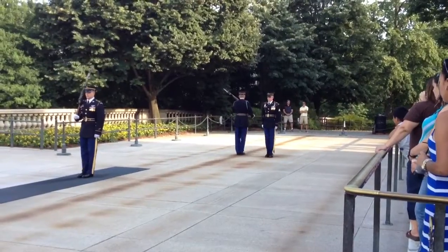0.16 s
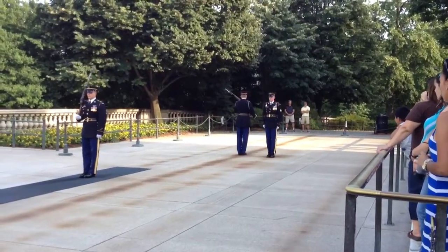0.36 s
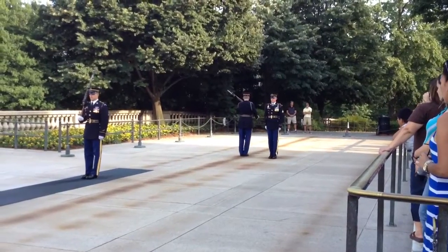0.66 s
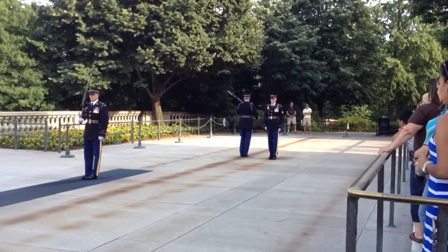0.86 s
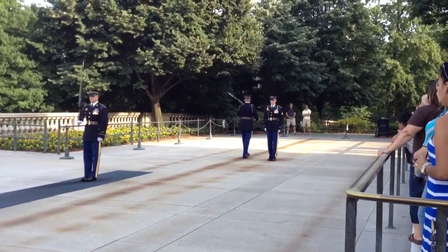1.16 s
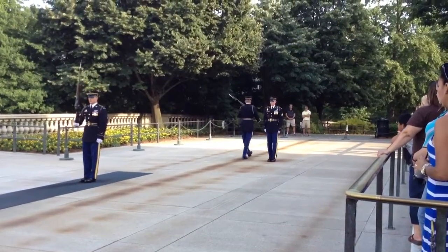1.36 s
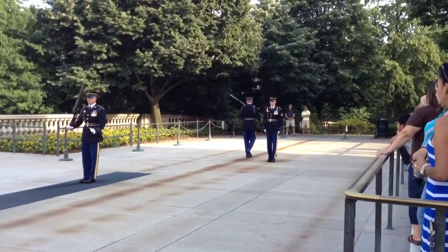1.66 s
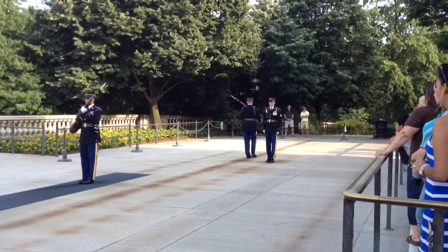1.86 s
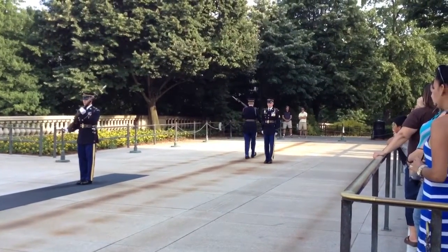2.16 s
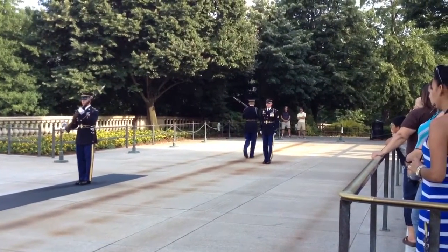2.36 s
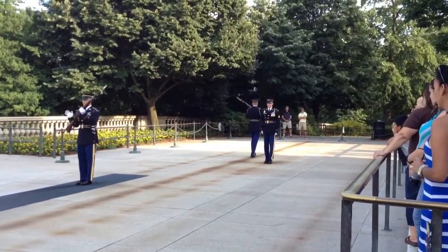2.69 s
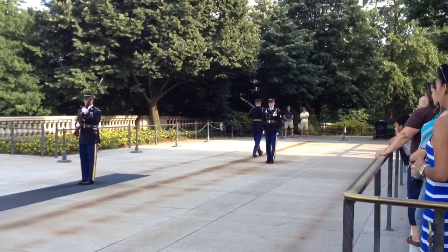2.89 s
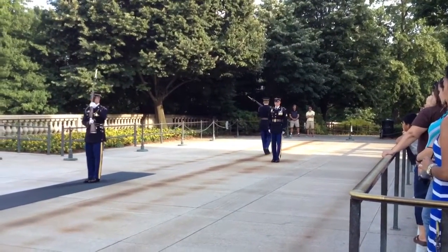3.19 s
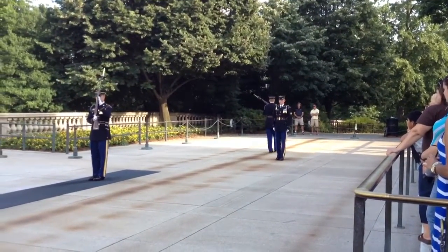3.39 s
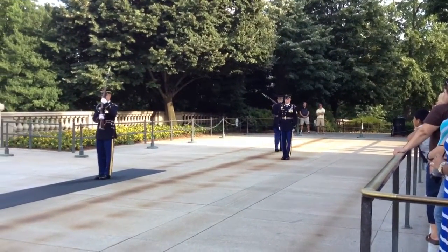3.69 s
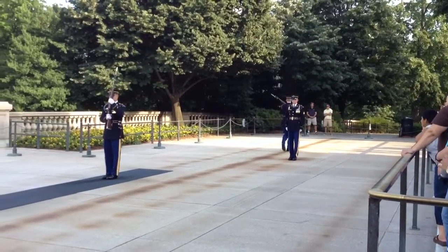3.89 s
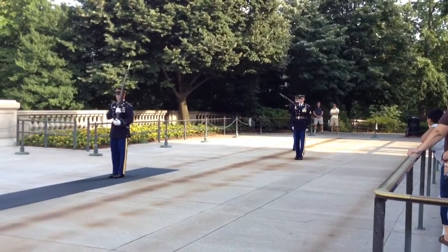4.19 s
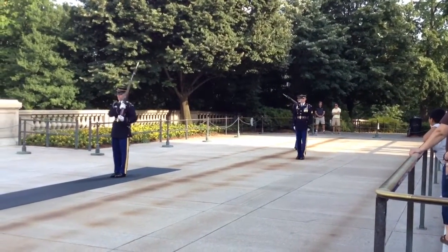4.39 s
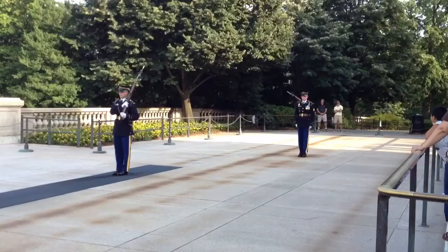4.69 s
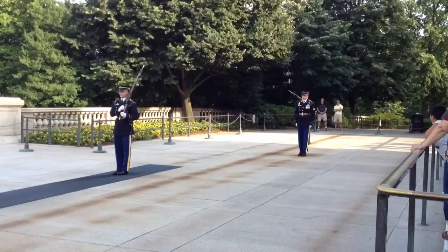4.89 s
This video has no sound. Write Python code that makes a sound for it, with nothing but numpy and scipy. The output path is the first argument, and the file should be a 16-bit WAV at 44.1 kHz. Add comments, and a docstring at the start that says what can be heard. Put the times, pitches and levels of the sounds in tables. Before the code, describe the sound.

Steel-tapped heels crack together on a stone plaza, then three sharp rifle slaps with rattling fittings echo over a low outdoor hum.

```python
"""Steel-shod heels crack together on a stone plaza; then hands slap a rifle and its fittings rattle.
Contacts are short noise bursts filtered by damped bodies; metal parts add decaying sine modes.
Small taps fall in between, and stone walls and trees return every blow as a decaying noise tail.
Behind lie a low hum of distant traffic and swells of insect hiss, both shaped noise,
and one faint bird, a run of gliding sine whistles."""
import sys
import numpy as np
from scipy import signal
from scipy.fft import rfft, irfft
from scipy.io import wavfile
from scipy.ndimage import uniform_filter1d

SR = 44100
rng = np.random.default_rng(int(sys.argv[2]) if len(sys.argv) > 2 else 0)


def int16_out(signal):
    """Quantize to a 16-bit WAV file."""
    q = np.round(np.clip(np.atleast_2d(signal).T, -1, 1) * 32767)
    wavfile.write(sys.argv[1], SR, q.astype(np.int16))


N = 222436

# Response of the rifle's stock. Each row: frequency in Hz, level in dB.
STOCK = [(100, -46), (450, -12), (750, -11.5), (1100, 1.5), (1400, -4.5), (1750, -4), (2700, -3.5),
         (3500, -9.5), (4600, -2), (5600, -6.5), (7100, -5), (8100, -10.5), (11000, -15), (12600, -9.5),
         (15000, -17)]


def amp(db):
    """Level law: decibels to amplitude gain."""
    return 10 ** (np.asarray(db) / 20)


def evened(x):
    """Power normalization: scales to rms 1."""
    return x / np.sqrt(np.mean(x ** 2) + 1e-20)


def read(points, hz):
    """Spectral interpolation along a logarithmic frequency axis."""
    f, value = np.transpose(points)
    return np.interp(np.log(hz + 1), np.log(f + 1), value)


def level(curve):
    """Amplitude envelope: a curve of seconds and dB becomes a gain for each sample."""
    return amp(np.interp(np.arange(N) / SR, *np.transpose(curve)))


def add(mix, s, sound):
    """Superposition: mixes a sound in, in place, at time s in seconds."""
    part = mix[max(round(s * SR), 0):][:len(sound)]
    part += sound[:len(part)]


def noise(spectrum):
    """Spectral shaping: white noise filtered to the given spectrum, steady, of rms 1."""
    white = rfft(rng.standard_normal(N))
    gain = amp(read(spectrum, np.fft.rfftfreq(N, 1 / SR)))
    return evened(irfft(white * gain, N))


def contact(decay, swell=0.00049, size=4096):
    """Contact force: tiny impacts that swell and die (times in s), of nearly even spectrum and energy 1."""
    t = np.arange(size) / SR
    fade = (1 - np.exp(-t / swell)) * np.exp(-t / decay)
    z = rfft(rng.standard_normal(size) * fade)
    flat = irfft(z / (abs(z) + 1e-12))  # keeps the phase, levels the spectrum
    burst = flat * np.sqrt(np.sqrt(fade))
    return burst / np.linalg.norm(burst)


def gritty(force, grit_db=3.0, size=40):
    """Uneven friction: the force comes in lumps about a millisecond long, with energy 1."""
    unevenness = evened(uniform_filter1d(rng.standard_normal(len(force)), size))
    lumps = force * amp(grit_db * unevenness)
    return lumps / np.linalg.norm(lumps)


def resonate(x, hz, width):
    """Single resonance: a band-pass of peak gain 1 and the given width in Hz."""
    return signal.lfilter(*signal.iirpeak(hz, hz / width, SR), x)


def bounce(force, soonest=0.00029, latest=0.00099, share=0.32):
    """Comb interference: a nearby hard surface adds one quick copy, at a random delay in s."""
    out = force.copy()
    add(out, rng.uniform(soonest, latest), share * force)
    return out / np.sqrt(1 + share ** 2)


def body(x, spectrum, tilt_db=0, size=4096):
    """Minimum phase: a damped body answers a force causally; the tilt in dB per octave turns about 3 kHz."""
    hz = abs(np.fft.fftfreq(size, 1 / SR))
    octaves = np.log2(np.maximum(hz, 750) / 3000)  # no further tilt below 750 Hz
    log_gain = np.log(amp(read(spectrum, hz) + tilt_db * octaves))
    # the Hilbert transform of the log gain supplies the phase
    response = np.fft.ifft(np.exp(np.conj(signal.hilbert(log_gain)))).real
    return signal.fftconvolve(x, response[:size // 2])


def ring(force, scatter=0.0059):
    """Modal decay: small metal parts ring on after a blow, their pitches scattered a little at random each time."""
    # Metal modes. Each row: pitch before scatter in Hz, level in dB, time to decay by 60 dB in seconds.
    metal_modes = [(1094, -35, 0.12), (1302, -42.5, 0.093), (3000, -48, 0.17), (4750, -49, 0.068),
                   (5100, -49, 0.12), (6400, -49, .1), (7400, -58, 0.076), (7280, -42, .07),
                   (12500, -44, 0.11), (12700, -55, 0.09), (13070, -51, .1)]
    t = np.arange(SR // 4) / SR
    modes = np.zeros(len(t))
    for hz, db, t60 in metal_modes:
        pitch = hz * (1 + scatter * rng.standard_normal())
        modes += amp(db - 60 * t / t60) * np.sin(2 * np.pi * pitch * t)
    return signal.fftconvolve(force, modes)


def traffic(rumble_db=-51, roar_db=-72, roar_growth_db_per_s=3.5):
    """Shaped noise and resonance: steady rumble, tyres drawing nearer, a slowly throbbing engine hum."""
    # Rumble spectrum. Each row: frequency in Hz, level per hertz in dB.
    rumble = [(20, -44.5), (50, -40.5), (70, -22), (95, -11), (150, -4), (240, -5.5), (380, -10),
              (520, -13), (700, -18), (1250, -17.5), (1650, -24), (3000, -37.5), (4500, -64.5)]
    # Roar of passing tyres. Each row: frequency in Hz, level in dB.
    tyres = [(100, -50.5), (260, -0.5), (350, 0), (430, -1.5), (600, -17.5), (2000, -77)]
    # Resonances of the low hum. Each row: frequency in Hz, width of each of two filter passes in Hz, level in dB.
    hum_resonances = [(157.7, 28.4, -2.5), (187.3, 21, 0), (200.1, 13, -8)]
    # Hum level before its throb. Each row: time in seconds, level in dB.
    hum_curve = [(0.6, -60.5), (1.15, -53.5), (1.55, -49), (2.3, -56), (5.04, -55)]
    throb_s, throb_peak_s, throb_db = .85, 1.44, 3.5  # period, time of one crest, swing either way

    t, drive = np.arange(N) / SR, rng.standard_normal(N)
    hum = np.zeros(N)
    for hz, width, db in hum_resonances:
        hum += amp(db) * evened(resonate(resonate(drive, hz, width), hz, width))
    throb = amp(throb_db * np.cos(2 * np.pi * (t - throb_peak_s) / throb_s))
    roar = amp(roar_db + roar_growth_db_per_s * t) * noise(tyres)
    return amp(rumble_db) * noise(rumble) + roar + level(hum_curve) * throb * evened(hum)


def insects(chorus_db=-74.5, rise_db_per_s=53, fall_db_per_s=39):
    """Power addition: bouts of hiss swell, hold and fade over a steady chorus."""
    # Hiss spectrum. Each row: frequency in Hz, level per hertz in dB.
    hiss = [(1000, -50), (2500, -16), (3600, -2), (4500, 2.5), (5300, 0.5), (6300, -1), (7500, -11.5),
            (9500, -14.5), (13000, -9.5), (15200, -6)]
    # Bouts of hiss. Each row: start in seconds, end in seconds, level in dB held between them.
    bouts = [(0.199, 0.717, -67), (1.624, 2.135, -71), (3.508, 3.96, -65), (4.53, 4.715, -71.5)]
    t, power = np.arange(N) / SR, amp(chorus_db) ** 2
    for start, end, db in bouts:
        rise = rise_db_per_s * np.maximum(start - t, 0)
        fall = fall_db_per_s * np.maximum(t - end, 0)
        power = power + amp(db - rise - fall) ** 2
    return np.sqrt(power) * noise(hiss)


def outdoors(air_db=-72.0):
    """Superposed ambient noise: traffic, still air and insects."""
    # Still air. Each row: frequency in Hz, level per hertz in dB.
    air = [(300, -39.5), (1500, -10.5), (2500, 0), (3300, 0), (5000, -4), (7000, 3.5), (9500, -3.5),
           (11000, -2), (12500, 0), (15200, 0.5)]
    return traffic() + amp(air_db) * noise(air) + insects()


def bird(low_hz=4500, high_hz=6500, length=0.055, count=12):
    """Frequency modulation: an even run of ever louder whistles sweeps up and flattens, blurred by leaves."""
    start_s, gap_s = .73, .0995
    song_db, growth_db_per_s = -73, 2.5
    out, u = np.zeros(N), np.linspace(0, 1, int(length * SR))
    for s in np.arange(count) * gap_s:
        sweep = low_hz + (high_hz - low_hz) * np.sin(u * np.pi / 2)
        hz = sweep * (1 + 0.018 * rng.standard_normal())
        whistle = np.sin(np.pi * u) * np.sin(2 * np.pi * np.cumsum(hz) / SR)
        blurred = signal.fftconvolve(whistle, contact(0.0046))
        add(out, start_s + s, amp(song_db + growth_db_per_s * s) * blurred)
    return out


def plaza(x, first=0.00644, hold=0.083, early_db=-2):
    """Diffuse reverberation: echoes keep coming while sound crosses the plaza, then each band dies away."""
    # Return of walls and trees. Each row: frequency in Hz, level in dB, time to decay by 60 dB in seconds.
    rows = np.array([(199.8, -14.5, 0.3), (596, -9.5, 0.47), (1100, -11.5, 0.51), (2180, -15.5, .6),
                     (3365, -11.5, 0.47), (4870, -13, 0.51), (7230, -12, 0.52), (10000, -11, 0.59),
                     (12370, -18.5, 0.49), (15630, -21.5, .35)])
    delay = np.arange(SR) / SR
    # sparse echoes of random sign, about 4000 a second
    echoes = rng.choice([-1., 1.], SR) * (rng.random(SR) < 4000 / SR) * (delay > first)
    hz, t, z = signal.stft(echoes, SR, nperseg=256)
    t60 = read(rows[:, ::2], hz)[:, None]
    late_fade_db = -60 * np.maximum(t - hold, 0) / t60
    fade = amp(late_fade_db + early_db * np.maximum(1 - t / hold, 0))
    # each band's level is set apart from its decay
    fade *= amp(read(rows[:, :2], hz))[:, None] / np.sqrt(np.mean(fade ** 2, axis=1, keepdims=True))
    tail = signal.istft(z * fade, SR)[1] / np.linalg.norm(echoes)
    return signal.fftconvolve(x, tail)[:N]


def taps(width_hz=550, peak_db=8, ring_db=-17, faint_db=-38, faint_decay=.005,
         low_hz=3000, high_hz=8000, count=6):
    """Resonant impact: light touches of shoes, each with one broad peak; fainter ones fall at random."""
    # Light touches. Each row: time in seconds, level in dB, decay in seconds, strongest pitch in Hz.
    touches = [(0.937, -30.5, 0.0022, 8200), (1.037, -28.5, 0.0039, 3350), (1.216, -33, 0.0049, 3030),
               (1.359, -29.5, 0.005, 4860), (1.462, -24, 0.0019, 5900), (1.597, -26.5, 0.0024, 4500),
               (1.65, -27, 0.0047, 5000), (2.925, -22, 0.0016, 8650), (3.043, -25, 0.0097, 3330),
               (3.988, -26.5, .0033, 4540), (4.379, -33, .0027, 5100), (4.4718, -32, 0.0046, 6400)]
    # Response of the touched body. Each row: frequency in Hz, level in dB.
    tap_body = [(300, -1), (1200, 6), (3000, -6.5), (4700, -5), (8000, -5), (9500, -19), (13000, -9),
                (15500, -66)]
    out = np.zeros(N)
    faint = []
    for when, pitch in rng.random((count, 2)):
        faint.append((when * N / SR, faint_db, faint_decay, low_hz + pitch * (high_hz - low_hz)))
    for s, db, decay, hz in list(touches) + faint:
        force = amp(db) * bounce(contact(decay, decay / 2))
        peak = amp(peak_db) * resonate(force, hz, width_hz)
        add(out, s, body(force + peak, tap_body))
        add(out, s, amp(ring_db) * ring(force))
    return out


def clinks(swell=0.0013, decay=0.0048, part_db=-1, part_width_hz=500):
    """Impact excitation: a loose fitting snaps once against the stock and rings on."""
    # Snaps of fittings. Each row: time in seconds, level in dB, pitch of the struck part in Hz,
    # treble tilt in dB per octave, metal ring in dB relative to the force.
    snaps = [(1.0780, -19, 5070, -0.5, 0.5), (1.908, -5, 6450, 1.5, -18), (2.8125, -10.5, 7300, 2, 0),
             (2.8414, -9.5, 2920, -0.5, -5), (3.6290, -12.5, 3120, -1, 1), (3.7195, -13.5, 7140, 2.5, -21),
             (3.754, -20, 7860, 3, -10), (3.7836, -14, 4370, 2.5, 2.5)]
    out = np.zeros(N)
    for s, db, hz, tilt_db, ring_db in snaps:
        force = amp(db) * contact(decay, swell)
        struck = amp(part_db) * resonate(force, hz, part_width_hz)
        add(out, s, body(force + struck, STOCK, tilt_db))
        add(out, s, amp(ring_db) * ring(force))
    return out


def rifle(part_db=0.5, part_loss_db=-1, part_width_hz=450, pitch_scatter=0.1, tilt_db=-1.43,
          thinning_db=0.12, slap_swell=0.00044, slap_decay=0.0064, rebound_swell=0.00087,
          rebound_decay=0.0099, jitter_s=.0004, slide_tilt_db=-2.2, count=7):
    """Repeated impact: a hand slides on and slaps; the rifle chatters, ever weaker and thinner, and rings."""
    # Hand slaps. Each row: time in seconds, level in dB, mean time between rebounds in seconds,
    # level change per rebound in dB, pitch of the struck part in Hz (scattered on rebounds),
    # metal ring in dB relative to the force, growth time of the slide before it in seconds, slide level in dB.
    slaps = [(1.8840, 5.5, .0103, -2.5, 1850, -11, 0.009, -5),
             (2.8080, -0.9, .0045, -4.5, 2230, -3, 0.00061, -6.5),
             (3.6896, -4, .0105, -2.5, 2080, -29, .012, -6.5)]
    out = np.zeros(N)
    for s, db, gap, loss_db, hz, ring_db, slide_s, slide_db in slaps:
        slide = gritty(contact(slide_s))[::-1]  # reversed, so it grows toward the slap
        add(out, s - len(slide) / SR, amp(slide_db) * body(slide, STOCK, slide_tilt_db))
        blows = [(s, amp(db) * contact(slap_decay, slap_swell), hz)]
        for k in range(1, count):
            late, detune = rng.standard_normal(2)
            rebound = amp(db + k * loss_db) * gritty(contact(rebound_decay, rebound_swell))
            blows.append((s + k * gap + jitter_s * late, rebound, hz * np.exp(pitch_scatter * detune)))
        for k, (when, force, pitch) in enumerate(blows):
            struck = amp(part_db + k * part_loss_db) * resonate(force, pitch, part_width_hz)
            add(out, when, body(force + struck, STOCK, tilt_db + k * thinning_db))
            add(out, when, amp(ring_db) * ring(force))
    return out


def heels(steel_swell=0.00031, steel_decay=0.00068, clack_decay=0.00084, thud_decay=0.0014,
          thud_lag=0.00054, shiver_decay=0.01, shiver_db=-11, leather_db=-13):
    """Impact on a layered body: steel cracks and shivers, the heel block clacks, the hollow shoe thuds after."""
    # Heel blows. Each row: time in seconds, steel plate in dB, hard heel clack in dB,
    # hollow shoe thud in dB, steel tilt in dB per octave.
    heel_blows = [(0.0299, 6, 18, 18.5, 2.5), (0.076, -7, -20.5, -6, -12), (0.0794, 13.5, 10, 18, -1.5),
                  (0.084, 4, -18, 9.5, -5.5), (0.0937, 8, 0.5, 12, -5.3), (0.1007, 6, 2.5, 8.5, -8),
                  (0.107, -4.5, -9, -7, -6)]
    # Responses of steel plate, heel block and hollow shoe. Each row: frequency in Hz, level in dB.
    steel_body, clack_body, thud_body = [(100, -42), (400, -23), (900, -13.5), (1500, -10.5), (3500, -18.5),
                                         (4300, -8.5), (4900, 2), (5400, -12.5), (6200, -7), (7500, -7.5),
                                         (9000, -13.5), (10900, -8.5), (11600, -1.5), (12700, 1),
                                         (13900, -11.5), (15500, -15.5)], [(100, -37.5), (400, -33.5), (900, -14),
                                                        (1300, -10.5), (1800, 1), (2250, -6.5),
                                                        (2670, -2.5), (3200, -20.5), (6200, -9.5),
                                                        (9000, -19.5), (15000, -32)], [(40, -39.5), (120, -24.5), (220, -7),
                                                                       (330, -7.5), (430, 0), (570, 1.5),
                                                                       (720, -9.5), (1100, -15.5),
                                                                       (2500, -35), (8000, -64.5)]
    out = np.zeros(N)
    for s, steel_db, clack_db, thud_db, tilt_db in heel_blows:
        steel = contact(steel_decay, steel_swell) + amp(shiver_db) * contact(shiver_decay)
        clack = contact(clack_decay) + amp(leather_db) * contact(shiver_decay)
        thud = contact(thud_decay) + amp(leather_db) * contact(shiver_decay)
        add(out, s, amp(steel_db) * body(steel, steel_body, tilt_db))
        add(out, s, amp(clack_db) * body(clack, clack_body))
        add(out, s + thud_lag, amp(thud_db) * body(thud, thud_body))
    return out


def scene(heel_wet_db=0, rifle_wet_db=0, bird_wet_db=5):
    """Superposition of direct sound, plaza echoes and ambience; radiation toward the walls is directional."""
    # Resonances the heel plates radiate sideways. Each row: frequency in Hz, width in Hz, level in dB.
    spill = [(3160, 340, 6), (5360, 170, 1.5), (7150, 500, -1.5)]
    shoes, gear, song = heels(), rifle() + clinks() + taps(), bird()
    sideways = shoes + sum(amp(db) * resonate(shoes, hz, width) for hz, width, db in spill)
    sent = amp(heel_wet_db) * sideways + amp(rifle_wet_db) * gear + amp(bird_wet_db) * song
    return (shoes + gear + song + plaza(sent) + outdoors())[None]


def record(dry, edge_hz=15380):
    """Band limiting: a linear-phase low-pass removes the highest treble."""
    lowpass = signal.firwin(511, edge_hz, window=("kaiser", 9), fs=SR)
    return signal.oaconvolve(dry, lowpass[None], "same")


dry = scene()
out = record(dry)
int16_out(out)
```